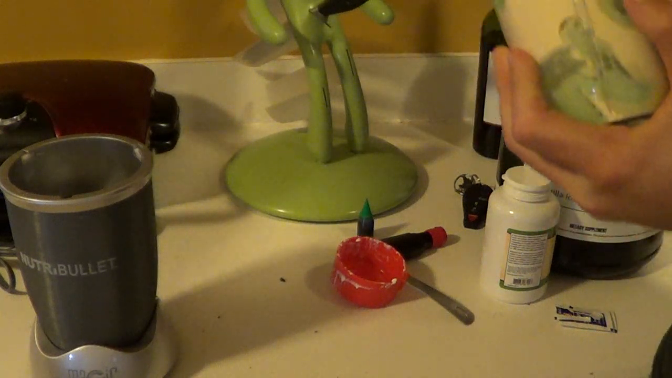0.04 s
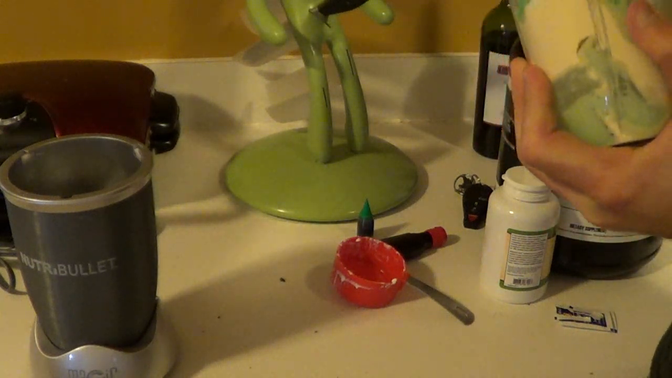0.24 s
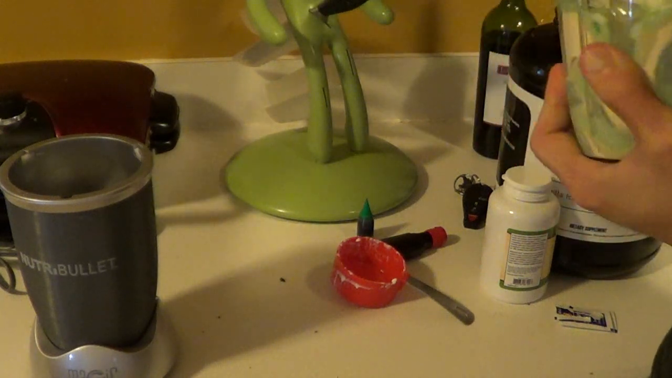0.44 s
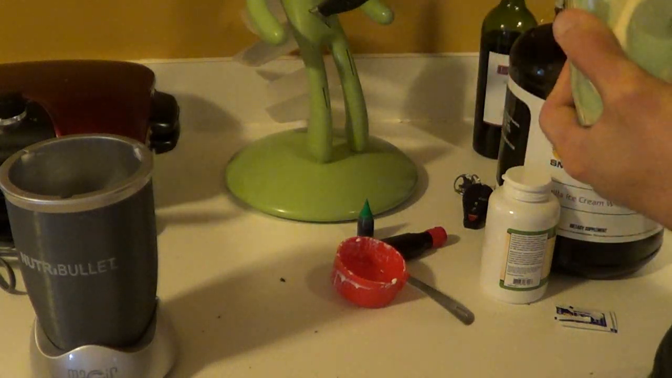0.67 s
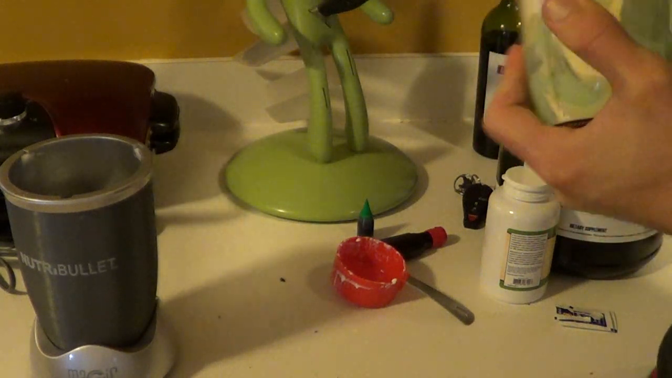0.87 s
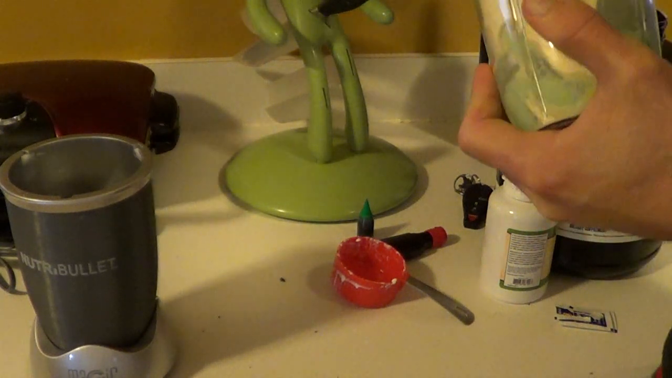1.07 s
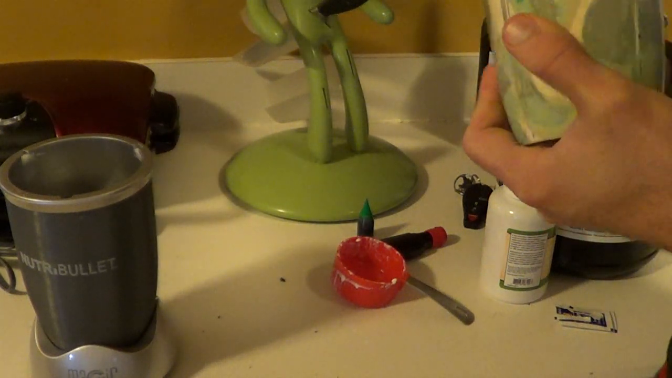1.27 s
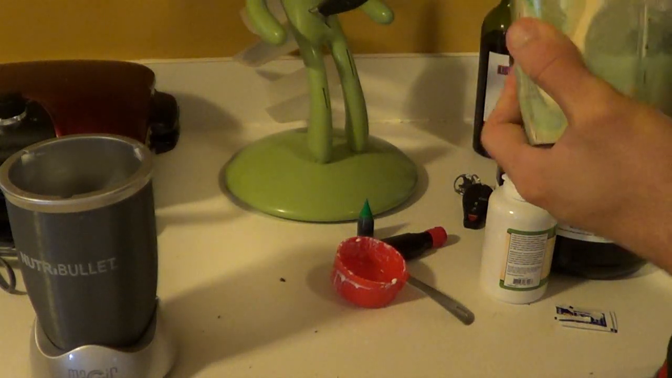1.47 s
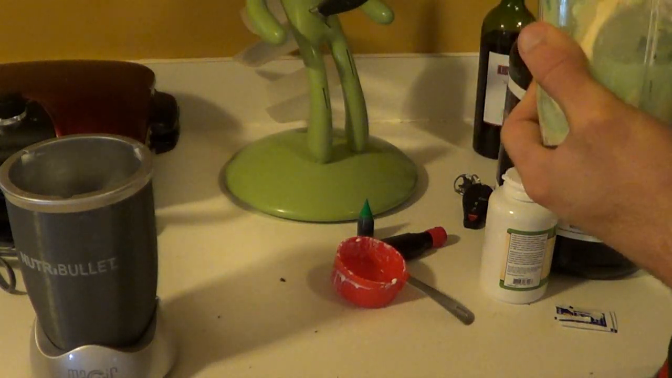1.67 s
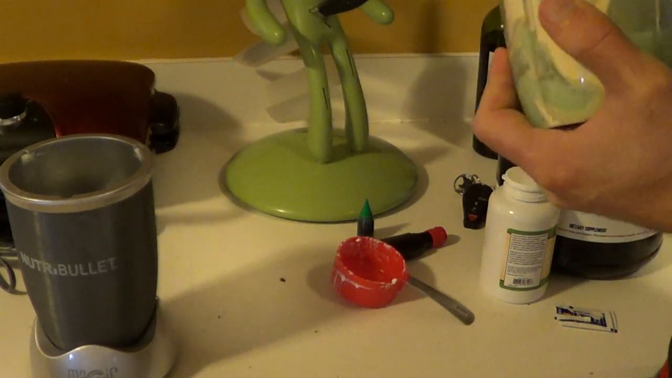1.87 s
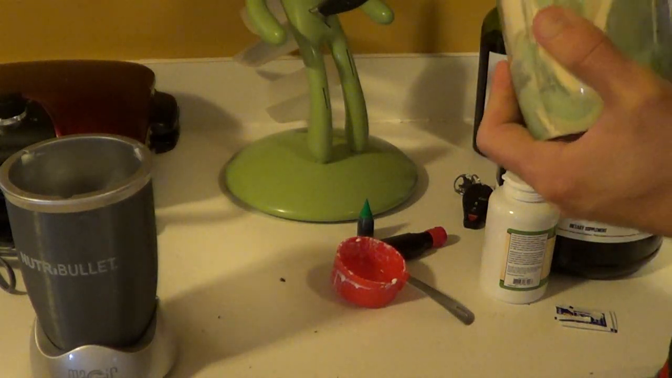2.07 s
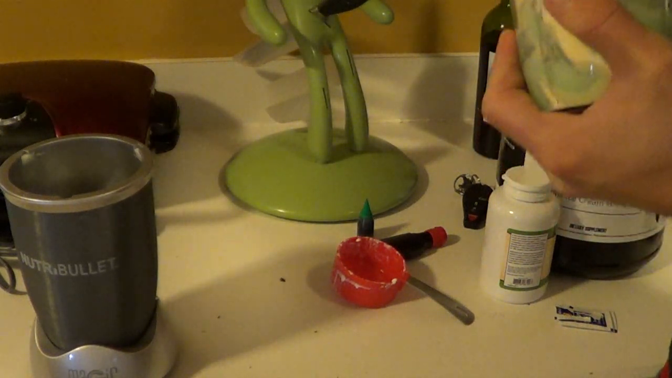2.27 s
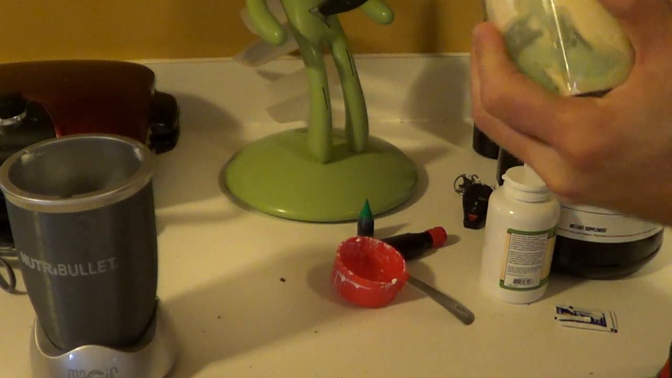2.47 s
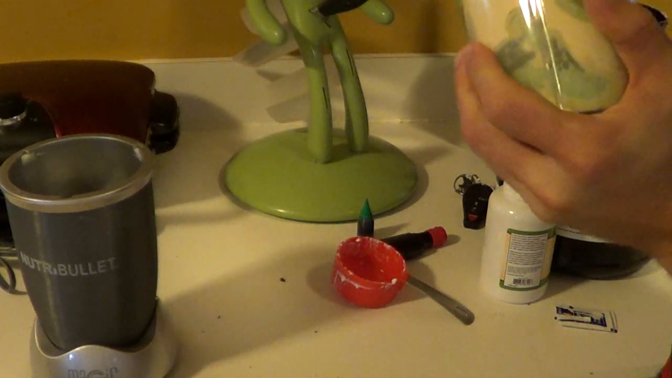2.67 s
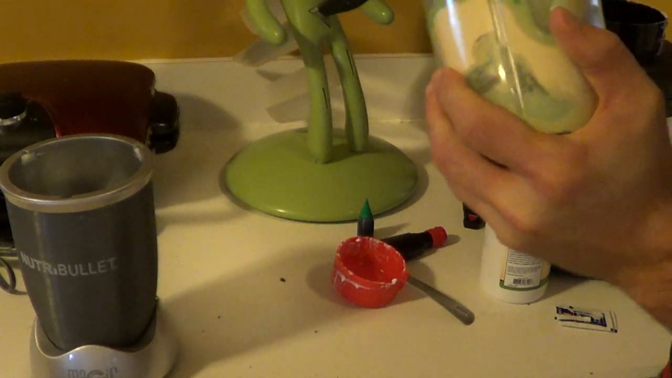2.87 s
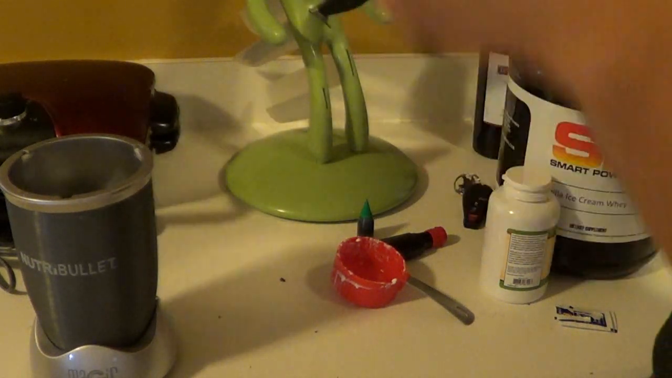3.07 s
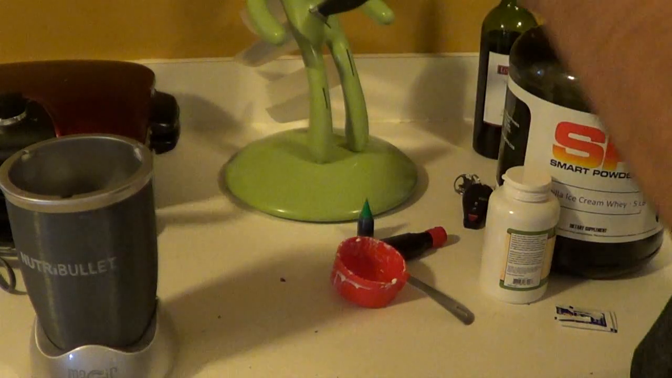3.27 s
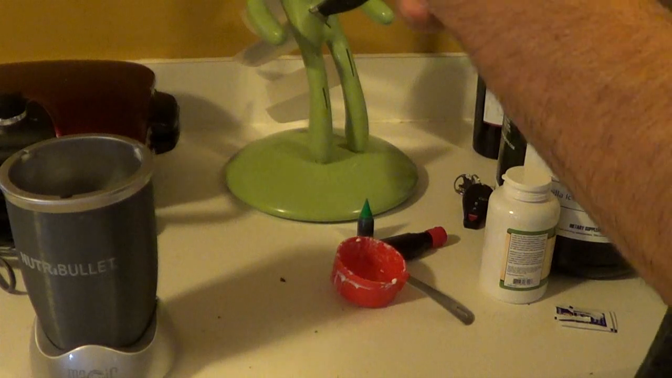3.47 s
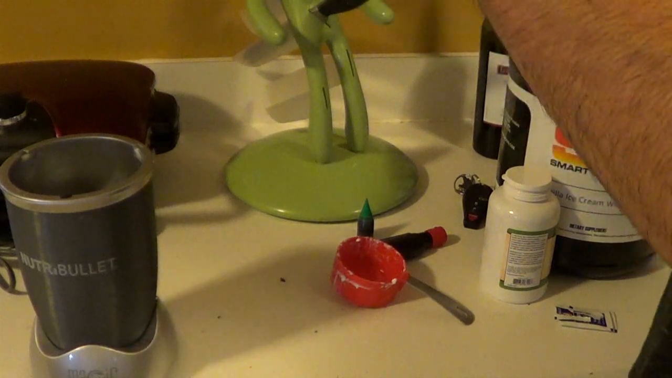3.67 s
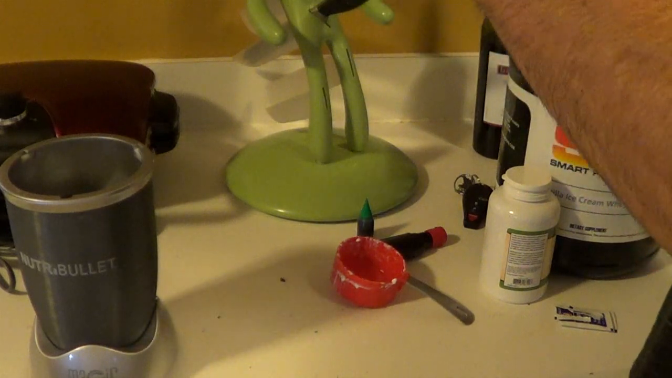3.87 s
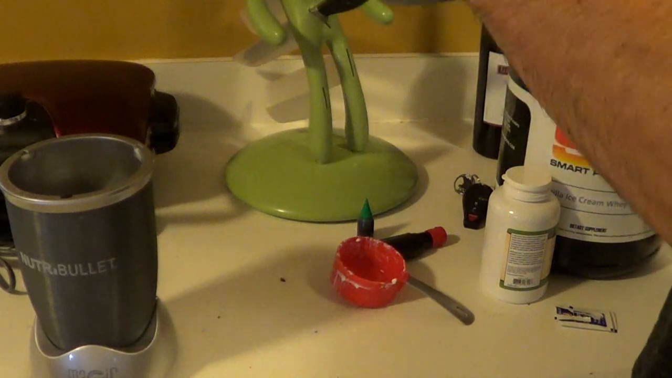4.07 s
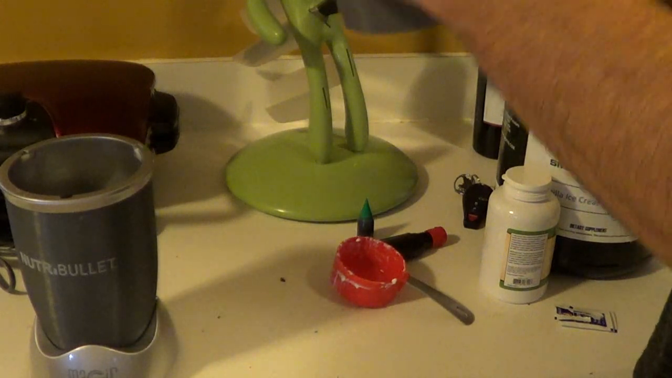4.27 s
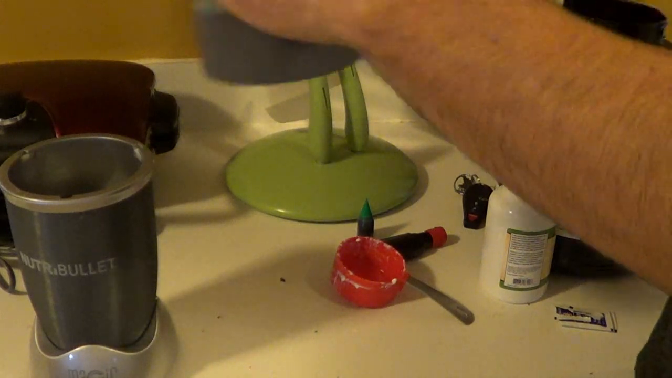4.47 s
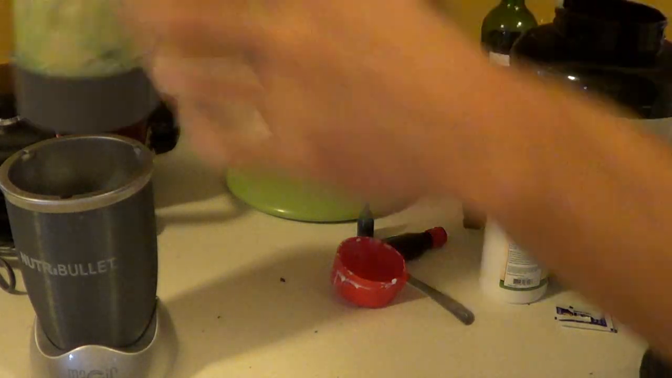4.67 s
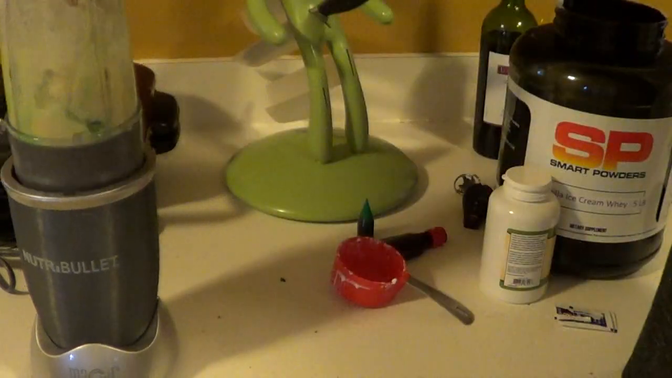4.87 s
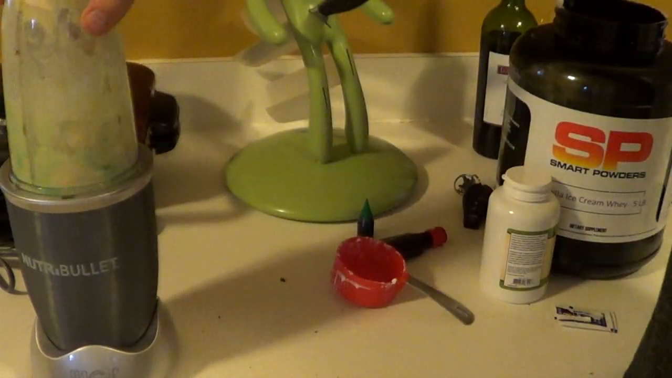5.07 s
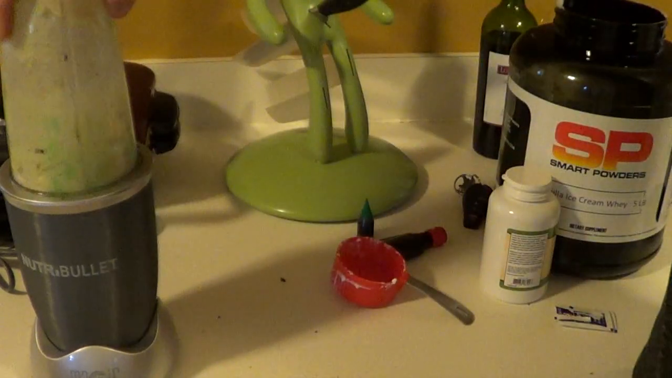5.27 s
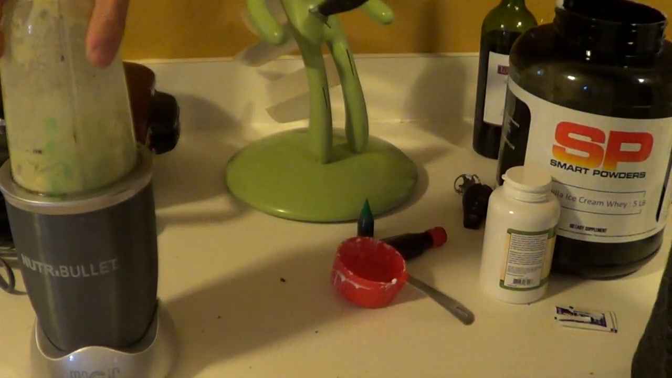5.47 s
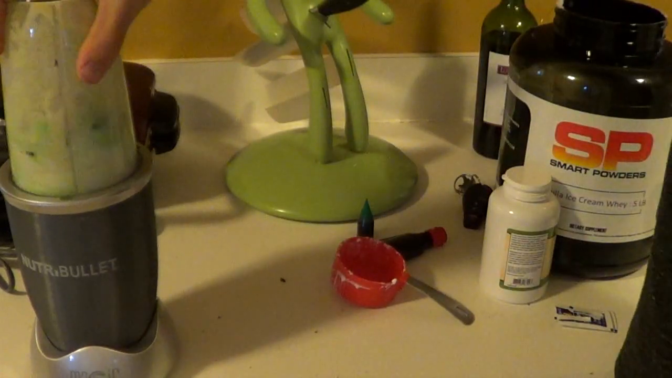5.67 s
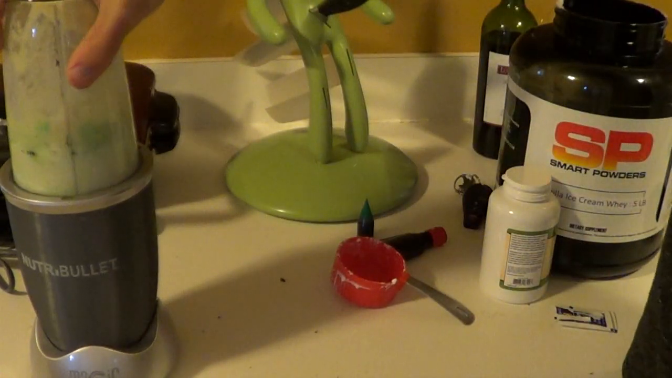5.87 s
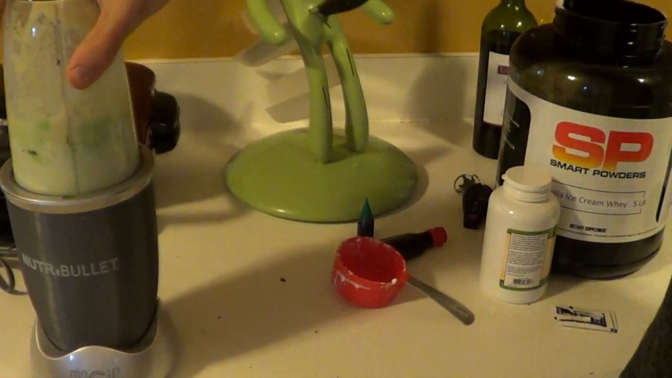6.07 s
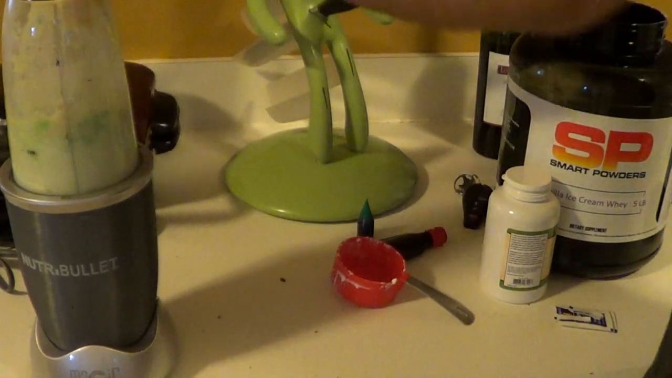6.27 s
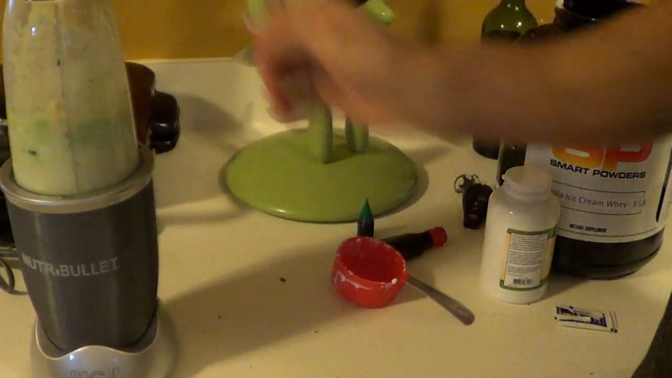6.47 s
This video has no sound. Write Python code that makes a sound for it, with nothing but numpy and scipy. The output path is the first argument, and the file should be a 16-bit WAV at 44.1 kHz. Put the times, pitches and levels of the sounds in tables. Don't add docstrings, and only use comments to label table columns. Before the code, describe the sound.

Hands rub and click a cap onto a plastic cup with a brief rubber squeak, slap it, knock it into a base, and a blender roars.

```python
import sys
import numpy as np
from scipy import signal
from scipy.fft import rfft, irfft, next_fast_len
from scipy.io import wavfile
from scipy.ndimage import uniform_filter1d

SR = 44100
rng = np.random.default_rng(int(sys.argv[2]) if len(sys.argv) > 2 else 0)


def file_out(sig):
    cols = np.atleast_2d(sig).T
    lim = np.clip(cols, -1, 1)
    pcm = np.round(lim * 32767).astype(np.int16)
    wavfile.write(sys.argv[1], SR, pcm)


def rack_gain(trim_db):
    fader = np.asarray(trim_db, float)
    return 10 ** (fader / 20)


N = 287973

# (frequency [Hz], level [dB])
ROOM_NOISE = [(12, -49), (20, -24), (139, -6), (244, -9.5), (281, -3.5), (416, -6), (465, -15), (506, -10),
              (1080, -20), (1180, -19), (11500, -31.5), (14300, -35), (16500, -79)]
# (frequency [Hz], likeness [-1 opposite
ROOM_SAME = [(60, 0.77), (180, 1), (550, 0.29), (1650, -1.4), (4970, 0.5), (15000, 0.41)]
MOTOR_SAME = [(60, 0.49), (180, 0.93), (550, 0.82), (1650, 0.87), (5000, 0.98), (12000, .98)]
ECHO_SAME = [(60, 0.98), (150, 0.58), (500, 0.65), (2000, 0.66), (6000, 0.68), (14000, 0.99)]
# (frequency [Hz], time to fall 60 dB [s])
KITCHEN = [(150, 0.35), (500, 0.44), (1500, 0.37), (4000, 0.43), (9000, 0.24), (15000, 0.13)]

# (frequency [Hz], level [dB])
SKIN = [(1470, -14.5), (2500, -15), (3370, -5.5), (4010, -2.5), (7860, 1), (14400, -6), (15400, -30),
        (16500, -88)]
CUP_WALL = [(250, -28), (500, -3), (1100, 0), (2000, -1.5), (3200, -8.5), (6000, -52)]
# (peak time [s], peak [dB], rise [s], fall [s], dull share [dB])
STROKES = [(.31, -31.5, 0.072, 0.63, -12), (.37, -41, 0.12, .25, -19), (.61, -23.5, 0.016, 0.029, -26),
           (.65, -49, .05, 0.98, -5.5), (.86, -47, 0.22, 0.14, -6), (1.24, -23.5, 0.025, 0.12, -11),
           (1.31, -41, 0.18, 0.85, -5.5), (1.6, -43, 0.7, .15, -16), (1.75, -29, 0.042, 0.5, -15.5),
           (1.86, -24, 0.077, 0.051, -18), (1.89, -39, 0.083, 0.088, 9.5), (2.33, -56, 0.27, 0.37, -4),
           (2.41, -24.5, 0.13, 0.047, -25), (2.49, -25, 0.085, 0.11, -6.5), (2.55, -45.5, .1, 0.28, -7),
           (3.1, -47, 0.12, 0.31, 0), (3.43, -37, 0.03, .057, -7), (3.52, -42.5, 0.067, 0.65, -4)]
# (peak time [s], peak [dB], fall [s], dull share [dB])
SETTLES = [(3.853, -21, .11, 4.5), (3.93, -47, 0.72, 8), (4.07, -14, 0.087, 1), (4.269, -14.5, 0.18, -5.5),
           (4.909, -22, 0.24, .1), (5.008, -30, 0.059, 7.5), (5.06, -10.5, 0.038, -18),
           (5.075, -23, 0.31, -3), (5.1, -22.5, 0.29, 2.5), (5.26, -31, 0.1, -10),
           (5.305, -31.5, 0.07, 13.5), (5.32, -7.5, 0.012, -6), (5.36, -35, 4, -5)]
# (time [s], slip rate [Hz], level [dB])
SQUEAK = [
    (.285, 600, -45.5),
    (.31, 1017, -35),
    (.33, 1935, -33.5),
    (.358, 2042, -23),
    (.374, 2117, -29),
    (.394, 2082, -24),
    (.406, 1930, -29),
    (.42, 1760, -25),
    (.44, 1500, -46),
]
# (multiple of the slip rate, level [dB])
SQUEAK_ORDERS = [(1, 0), (1.148, -19), (1.622, -18.5), (1.999, -10), (2.618, -16.5), (3, -6.5), (4, -17),
                 (4.998, -20)]
# (time [s], peak [dB], centre [Hz], cup ring [dB])
CLICKS = [(0.3438, -25, 6120, -61), (0.529, -27, 5490, -60), (0.6089, -13.5, 9400, -55),
          (0.8288, -22, 8000, -45), (0.834, -27, 9800, -60), (0.8643, -21, 4840, -50),
          (0.895, -32, 4100, -49), (1.0178, -32, 7000, -47), (1.048, -30, 5000, -54),
          (1.079, -31, 9080, -48), (1.1412, -28, 8300, -57), (1.2315, -12.5, 7600, -39.5),
          (1.2667, -15, 7600, -37.5), (1.8815, -15, 5100, -24), (1.955, -19, 3530, -42),
          (2.1824, -26.5, 7040, -48), (2.251, -33, 7000, -64), (2.2775, -23.5, 3800, -47),
          (2.3943, -20, 5490, -58), (2.4562, -13.5, 5170, -50), (2.4749, -21, 4970, -50),
          (2.4881, -13.5, 5260, -62), (2.5004, -21, 4100, -47), (3.091, -17, 8500, -63),
          (3.3323, -38, 8450, -71), (3.419, -21, 6960, -64), (3.7952, -32, 6250, -64),
          (3.9866, -25, 3870, -59), (4.0136, -24, 3800, -44), (0.394, -28, 5000, -60),
          (0.625, -32, 6000, -60), (4.287, -13, 2510, -32), (4.492, -33, 1000, -50)]
# (time [s], peak [dB], centre [Hz], cup ring [dB])
CATCHES = [
    (5.2055, -15, 4900, -30),
    (5.258, -15, 4800, -47),
    (5.373, -24, 6200, -31),
    (5.6075, -8, 9500, -41),
]
# (time [s], peak [dB], centre [Hz], cup ring [dB])
LUMPS = [(5.6173, -10, 2900, -20), (5.618, -17, 10300, -40), (5.629, -10, 11000, -40),
         (5.634, -11, 4500, -30), (5.6432, -12, 5600, -30), (5.653, -10, 5000, -42),
         (5.6602, -7, 10300, -40), (5.664, -6, 9500, -40), (5.672, -14, 12500, -40),
         (5.684, -14, 11000, -38), (5.693, -13, 5500, -26), (5.7335, -14, 4920, -40),
         (5.7674, -14, 4870, -40)]

# (time [s], peak [dB], pitch [Hz])
PUFFS = [
    (1.879, -20.5, 396),
    (3.8536, -12.5, 276),
    (4.0647, -5, 340),
    (4.2645, -9, 464),
    (4.289, -20, 900),
    (4.112, -25, 395),
    (4.312, -24, 400),
]
# (time [s], peak [dB], pitch [Hz])
PINGS = [(.324, -27.5, 2430), (.334, -35, 5500), (0.356, -31, 3340), (.42, -29, 8700), (0.603, -38, 980),
         (1.245, -26.5, 2810), (1.859, -22, 5670), (1.879, -25.5, 3170), (1.881, -24.5, 1390),
         (2.181, -43, 1610), (3.1, -39.5, 1320), (3.17, -41, 1390), (3.46, -41, 1900), (3.491, -33, 1020),
         (3.516, -37, 1830), (3.544, -32.5, 1800), (3.57, -39, 1970), (3.824, -43, 1420),
         (3.991, -28, 1570), (4.084, -14.5, 5870), (4.25, -20, 1500), (4.263, -15, 4120), (4.29, -19, 4000),
         (4.27, -23, 1760), (1.09, -45, 1500), (4.3, -25, 1750), (4.33, -28, 1620), (5.003, -23, 1090),
         (5.21, -24, 1090), (4.93, -28, 1220), (2.028, -46, 900), (5.056, -15.5, 6000), (5.068, -20, 4570),
         (5.184, -35, 4850), (5.557, -37, 1997), (5.608, -14, 9700)]
# (time [s], peak [dB], pitch [Hz], time to fall 60 dB [s])
BOOMS = [(1.858, -19.5, 2966, .025), (4.902, -30.5, 400, 0.059), (4.903, -13.5, 660, 0.073),
         (4.935, -22.5, 710, .1), (4.915, -20.5, 132, 0.13), (5.02, -18, 140, .12),
         (5.005, -21, 398, 0.064), (4.902, -19.5, 267, .05), (5.09, -5, 382, .11),
         (5.095, -10.5, 134.7, 0.18), (5.145, -15, 305, 0.031), (5.09, -19, 70, 0.16),
         (5.16, -19.5, 430, 0.11), (5.12, -17.5, 540, 0.095), (5.31, -21, 545, 0.13),
         (5.318, -13.5, 68.5, 0.15), (5.3, -13, 375, 0.1), (5.332, -18.5, 138, 0.12)]
# (time [s], peak [dB], cup thud [dB], counter ring [dB], rattle [s])
KNOCKS = [(3.85, -10, -43, -57, 0.0053), (4.0625, -9, -28, -45, 0.0048), (4.082, -14.5, -30, -47, 0.0064),
          (4.2487, -17, -36, -60, 0.007), (4.2613, -6.5, -25.5, -45, 0.01), (4.9, -4.5, -25.5, -15, 0.0048),
          (5.0003, -11, -25, -24, 0.0054), (5.0536, -26, -52, -37, 0.011), (5.068, -12, -39, -41, 0.0086),
          (5.0868, -7, -9.5, -4.5, 0.018), (5.2997, -11, -25, -22, 0.0082), (5.3196, -4.5, -22, -12, 0.014),
          (5.588, -41, -28.5, -48, 0.015), (5.6165, -16, -15, -28, 0.011)]
# (frequency [Hz], level [dB])
CRACK = [(410, -25), (700, -1.5), (1430, -9), (3160, -4), (7970, -8), (8980, -1.5), (14800, -19.5),
         (15900, -15), (16500, -53)]
# (pitch [Hz], level [dB], time to fall 60 dB [s])
CUP = [(279, 5.5, 0.016), (414, -6, 0.026), (540, -5.5, 0.036), (684, 1, 0.014)]
COUNTER = [(73, -9, 0.2), (135.4, 3, 0.13), (150, -23, 0.18), (239, -13, 0.072)]

# (time [s], turns per second [Hz])
SHAFT = [
    (5.61, 70),
    (5.69, 118),
    (5.77, 134),
    (5.9, 143),
    (6.03, 156.7),
    (6.22, 157.4),
    (6.35, 152.5),
    (6.48, 165),
    (6.54, 168.5),
]
# (frequency [Hz], level [dB])
SLOW_ROAR = [(40, -17), (90, -33), (135, 7), (210, -8), (390, -0.5), (800, -21), (1700, -3), (3000, -8),
             (6000, -22), (9500, -12.5), (12000, -19), (14500, -41), (15500, -48)]
FAST_ROAR = [(40, -24), (110, -30), (150, -29), (270, 11), (380, 3.5), (620, 5), (950, 7.5), (1450, 3.5),
             (3000, 6), (5200, 6.5), (6600, -12), (9500, -37)]
# (frequency [Hz], level under its last point [dB])
MUFFLE = [(12300, -8), (13000, -14), (14500, -17), (15300, -24), (15800, -55)]
# (frequency [Hz], level [dB])
SPLASH = [(410, -20), (800, -2.5), (1680, -5), (4800, -8.5), (10900, -14), (13000, -25.5), (15100, -28),
          (15500, -75)]
SPRAY = [(3000, -20), (8000, -3), (12000, 0), (14500, -1), (15800, -8), (16300, -50)]
# (centre [Hz], width [Hz], level [dB])
BASE = [(136, 33, -21), (398, 128, -7), (499, 110, -9), (757, 40, -22)]
HOUSING = [(1275, 63, -22), (2930, 1150, -14.5), (4850, 170, -20), (7960, 310, -20)]
# (time [s], level [dB])
WHINE = [
    (5.9, -45),
    (5.97, -33),
    (6.01, -26),
    (6.22, -25),
    (6.28, -28),
    (6.38, -27.5),
    (6.43, -26),
    (6.53, -28),
]
# (start [s], length [s], level [dB])
BITES = [
    (6.183, 0.21, -23),
    (6.433, 0.12, -24.5),
]
# (start [s], length [s], pitch [Hz], level [dB])
SINGING = [(5.608, 0.13, 135, -24), (5.606, 0.047, 340, -19), (5.63, .1, 530, -27), (5.67, 0.083, 440, -23),
           (5.615, .05, 1790, -27), (5.8, 0.17, 551, -21.5), (5.8, 0.14, 390, -24.5),
           (5.74, .06, 1100, -30), (5.76, 0.045, 8200, -25), (5.77, .06, 2950, -26),
           (5.77, 0.24, 4950, -26), (6, .22, 4950, -26), (6.02, .11, 450, -24), (6.05, 0.067, 570, -26),
           (6.01, .04, 2950, -23), (6.08, .06, 1080, -29), (6.11, .06, 3100, -22), (6.2, .08, 760, -27.5),
           (6.29, .21, 1702, -26.5), (6.255, .05, 1715, -24), (5.95, .1, 500, -26), (6.47, .06, 560, -26.5),
           (6.27, 0.15, 390, -22.5), (6.34, .06, 990, -31), (6.33, 0.18, 4450, -25),
           (6.4, 0.055, 4900, -27), (6.44, .08, 450, -27)]

START_S = 5.614
FULL_SPEED_HZ = 150


def evened(x):
    return x / np.sqrt(np.mean(x ** 2) + 1e-20)


def read(points, hz):
    f, value = np.transpose(points)
    return np.interp(np.log(hz + 1), np.log(f + 1), value)


def curves(rows):
    s, *columns = np.transpose(rows)
    return [np.interp(np.arange(N) / SR, s, column) for column in columns]


def add(mix, s, sound):
    part = mix[round(s * SR):][:len(sound)]
    part += sound[:len(part)]


def resonate(x, hz, width):
    turn = np.exp(2j * np.pi * np.cumsum(hz * np.ones(x.shape[-1])) / SR)
    r = np.exp(-np.pi * width / SR)
    for _ in range(2):
        x = 2 * (turn * signal.lfilter([1 - r], [1, -r], x / turn)).real
    return x


def coloured(x, spectrum):
    length = x.shape[-1]
    size = next_fast_len(length)
    gain = rack_gain(read(spectrum, np.fft.rfftfreq(size, 1 / SR)))
    return evened(irfft(rfft(x, size) * gain, size)[..., :length])


def hiss(same, patchy_db):
    frames, hz = N // 128 + 5, np.fft.rfftfreq(512, 1 / SR)
    a, b, c, d, patches = rng.standard_normal((frames, 257, 5)).T
    patches = uniform_filter1d(patches, size=5, axis=0)
    patches = evened(uniform_filter1d(patches, size=16, axis=1))
    like = np.clip(read(same, hz), -1, 1)[:, None]
    left = a + 1j * b
    right = like * left + np.sqrt(1 - like ** 2) * (c + 1j * d)
    z = np.array([left, right]) * rack_gain(patchy_db * patches)
    return evened(signal.istft(z, nperseg=512, noverlap=384)[1][:, :N])


def ring(modes, spread):
    t = np.arange(SR // 3) / SR
    x = np.zeros(len(t))
    for hz, db, t60 in modes:
        level_luck, pitch_luck = rng.standard_normal(2)
        tone = np.sin(2 * np.pi * hz * (1 + spread * pitch_luck) * t)
        x += rack_gain(db + 6.0 * level_luck - 60 * t / t60) * tone
    x *= np.minimum(t / 0.0026, 1)
    return x / abs(x).max()


def room_noise():
    return rack_gain(-49.5) * coloured(hiss(ROOM_SAME, patchy_db=2.5), ROOM_NOISE)


def kitchen(x):
    size = SR * 3 // 4
    taps = np.zeros((2, 3, size))
    at = np.arange(160, size - 20, 20) + rng.integers(0, 20, (2, 3, (size - 161) // 20))
    np.put_along_axis(taps, at, rng.choice([-1., 1.], at.shape), 2)
    hz, t, z = signal.stft(taps, SR, nperseg=256)
    like = np.clip(read(ECHO_SAME, hz), 0, 1)[:, None]
    z[1] = like * z[0] + np.sqrt(1 - like ** 2) * z[1]
    dying = rack_gain(-60 * t / read(KITCHEN, hz)[:, None])
    tail = signal.istft(z * dying, SR, nperseg=256)[1]
    tail = tail / np.linalg.norm(tail, axis=2)[..., None]
    turn = 2 * np.pi * (np.arange(N) / SR * 9 + np.arange(3)[:, None] / 3)
    shares = x * np.sqrt(2 / 3) * np.cos(turn)
    return signal.fftconvolve(shares[None], tail, axes=2).sum(1)[:, :N]


def stroke(t, peak, db, rise, fall):
    return rack_gain(db - 37.5 * np.maximum((peak - t) / rise, (t - peak) / fall))


def rub():
    t = np.arange(0, N + 64, 64) / SR
    settle_rise_s, grip_db, grip_dull_db = 0.0068, -53, -0.5
    settles = [(s, db, settle_rise_s, fall, dull_db) for s, db, fall, dull_db in SETTLES]
    bright = rack_gain(grip_db) * np.ones(len(t))
    dull = rack_gain(grip_db + grip_dull_db) * np.ones(len(t))
    for peak, db, rise, fall, dull_db in list(STROKES) + settles:
        gain = stroke(t, peak, db, rise, fall)
        bright += gain
        dull += rack_gain(dull_db) * gain
    bright, dull = (np.interp(np.arange(N) / SR, t, gain) for gain in (bright, dull))
    bursts_db = 4.33 * np.minimum(rng.exponential(1, (2, N)), 5)
    slips = rng.standard_normal((2, N)) * rack_gain(bursts_db)
    return rack_gain(-8.5) * (bright * coloured(slips[0], SKIN) + dull * coloured(slips[1], CUP_WALL))


def squeak():
    hz, level_db = curves(SQUEAK)
    grip = np.clip(np.maximum.accumulate(hz) / 2000, 0, 1) ** 2.46
    wobble = evened(uniform_filter1d(rng.standard_normal((2, N)), size=80))
    roughness = 0.01 + 0.45 * (1 - grip)
    turns = np.cumsum(hz * (1 + roughness * wobble[0])) / SR
    stack = sum(rack_gain(db) * grip ** (k - 1) * np.sin(2 * np.pi * k * turns) for k, db in SQUEAK_ORDERS)
    at = np.arange(N)
    on = (at > SQUEAK[0][0] * SR) & (at < SQUEAK[-1][0] * SR)
    return on * rack_gain(level_db + 2.0 + 1.25 * wobble[1]) * stack


def clicks():
    out, t = np.zeros(N), np.arange(1200) / SR
    for s, db, hz, cup_db in list(CLICKS) + list(CATCHES) + list(LUMPS):
        noise = rng.standard_normal(len(t)) * 0.4 * np.exp(-t / 0.0025)
        noise[:2] += [2.23, -2.23]
        snap = resonate(noise, hz, 0.97 * hz)
        add(out, s, rack_gain(db) * snap / abs(snap).max())
        add(out, s, rack_gain(cup_db + 6.5) * ring(CUP, 0.16))
    return out


def struck_patch(hz, t60, tone, grain):
    t = np.arange(6000) / SR
    burst = evened(resonate(rng.standard_normal(len(t)), hz, 0.19 * hz))
    ping = (tone * np.sin(2 * np.pi * hz * t) + grain * burst) * rack_gain(-60 * t / t60)
    return ping * np.minimum(t / 0.001, 1)


def pings():
    out = np.zeros(N)
    for s, db, hz in PINGS:
        t60 = 0.035 * (2000 / hz) ** 0.068
        add(out, s, rack_gain(db) * struck_patch(hz, t60, tone=0.3, grain=0.82))
    for s, db, hz, t60 in BOOMS:
        add(out, s, rack_gain(db) * struck_patch(hz, t60, tone=1.06, grain=0.33))
    return out


def puffs():
    out, t = np.zeros(N), np.arange(-300, 300) / SR
    for s, db, hz in PUFFS:
        u = (np.pi * hz * t) ** 2
        add(out, s + t[0], -rack_gain(db) * (1 - 1.64 * u) * np.exp(-u))
    return out


def knocks():
    out, t = np.zeros(N), np.arange(6000) / SR
    for s, db, thud_db, counter_db, rattle in KNOCKS:
        shake = rng.standard_normal(len(t)) * (np.exp(-t / 0.0034) + 0.26 * np.exp(-t / rattle))
        shake[0] += 3.5
        crack = coloured(np.pad(shake, 200), CRACK)[196:]
        add(out, s, rack_gain(db) * crack / abs(crack).max())
        add(out, s, -rack_gain(thud_db) * ring(CUP, 0.047))
        add(out, s, rack_gain(counter_db - 9.5) * ring(COUNTER, 0.0048))
    return out


def singing():
    out = np.zeros(N)
    for s, length, hz, db in SINGING:
        t = np.arange(0, length, 1 / SR)
        noise = rng.standard_normal(len(t) + 4000)
        fuzz = evened(resonate(noise, hz, 0.039 * hz)[4000:])
        if hz <= 2000:
            fuzz = 0.43 * fuzz + 1.21 * np.sin(2 * np.pi * hz * t)
        add(out, s, rack_gain(db) * np.sin(np.pi * t / length) ** .5 * fuzz)
    return out


def churning(noise, shaft_hz):
    t = np.arange(N) / SR
    speed = np.clip((shaft_hz - 105) / 30, 0, 1)
    fast = list(FAST_ROAR) + [(hz, FAST_ROAR[-1][1] + db) for hz, db in MUFFLE]
    roar = (1 - speed) * coloured(noise, SLOW_ROAR) + speed * coloured(noise, fast)
    drops = hiss(ECHO_SAME, patchy_db=1.5) * rack_gain(2.2 * np.minimum(rng.exponential(1, N), 5))
    splash = rack_gain(-2) * coloured(drops, SPLASH)
    spray_db = -20 - 150 * np.maximum(t - 5.69, 0)
    return roar + splash + rack_gain(spray_db) * coloured(drops, SPRAY)


def shaking(noise, body):
    idle = int(START_S * SR) - 4000
    sound = sum(rack_gain(db) * evened(resonate(noise[:, idle:], hz, width)) for hz, width, db in body)
    return np.pad(sound, ((0, 0), (idle, 0)))


def motor_tones(turn, shaft_hz, waver):
    t, (whine_db,) = np.arange(N) / SR, curves(WHINE)
    fan_db = -12 - 60 * np.maximum(t - 6.3, 0)
    commutator = np.sin(36 * turn) + rack_gain(fan_db) * np.sin(60 * turn)
    bite = rack_gain(-45)
    for s, length, db in BITES:
        bite = bite + rack_gain(db) * np.sin(np.pi * np.clip((t - s) / length, 0, 1)) ** .5
    held_up_hz = np.maximum(155.5 - shaft_hz, 0)
    blades = np.sin(6 * turn + 2 * np.pi * np.cumsum(6 * held_up_hz) / SR)
    whine = rack_gain(whine_db + 3 + 1.8 * waver[0]) * commutator
    hum = rack_gain(-33 + 2.0 * waver[1]) * np.sin(turn)
    return whine + bite * rack_gain(3 + 2 * waver[1]) * blades + hum


def blender():
    t, (shaft_hz,) = np.arange(N) / SR, curves(SHAFT)
    on = np.clip((t - START_S) / 0.0043, 0, 1) ** 2
    level_db = -16 - 1.5 * np.clip(1 - shaft_hz / FULL_SPEED_HZ, 0, 1)
    drone_db = 1.5 - 6.5 * np.maximum(t - START_S, 0)
    noise = hiss(MOTOR_SAME, patchy_db=1.4)
    roar = churning(noise, shaft_hz)
    housing = shaft_hz / FULL_SPEED_HZ * shaking(noise, HOUSING)
    base = rack_gain(drone_db) * shaking(noise, BASE)
    waver = uniform_filter1d(rng.standard_normal((3, N)), size=700)
    waver = evened(uniform_filter1d(waver, size=700))
    turn = 2 * np.pi * np.cumsum(shaft_hz * (1 + .001 * waver[0])) / SR
    throb = 1 + 0.14 * np.cos(turn)
    tones = motor_tones(turn, shaft_hz, waver[1:]) + singing()
    return on * (rack_gain(level_db) * (roar + housing + base) * throb + tones)


def scene():
    hands = rub() + squeak() + clicks() + pings()
    blows, air = knocks(), puffs()
    left_db = np.interp(np.arange(N) / SR, [4.6, 4.8], [-.8, .2])
    near = (hands + blows + air) * rack_gain(np.array([left_db, -left_db]))
    echoes = kitchen(rack_gain(-6.5) * hands + rack_gain(0.5) * blows + rack_gain(-8.5) * air)
    return room_noise() + near + echoes + blender()


def low_pass(x):
    return signal.sosfilt(signal.butter(12, 16750, fs=SR, output="sos"), x)


def record(dry):
    power_db = 10 * np.log10(abs(uniform_filter1d((dry ** 2).mean(0), size=200)) + 1e-12)
    fall = np.arange(N) * 60. / SR
    recent_peak_db = np.maximum.accumulate(power_db + fall) - fall
    over_db = np.maximum(recent_peak_db + 17.0, 0)
    held = dry / rack_gain(.5 * uniform_filter1d(over_db, size=100))
    treble_cut = signal.ellip(8, .1, 70, 16200, "lowpass", fs=SR, output="sos")
    return low_pass(signal.sosfilt(treble_cut, held))


dry = scene()
out = record(dry)
file_out(out)
```